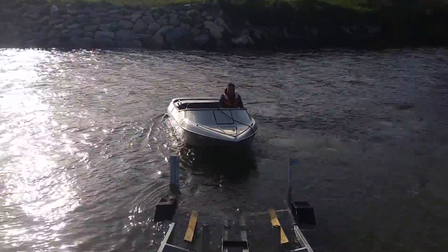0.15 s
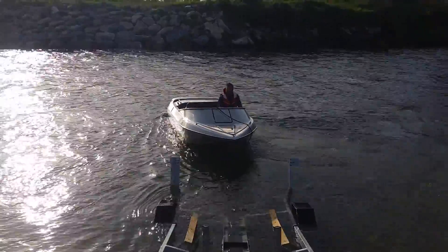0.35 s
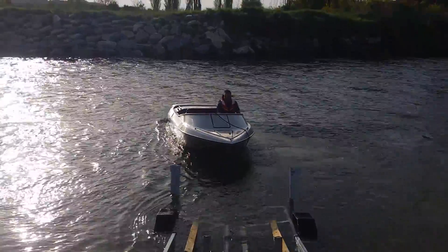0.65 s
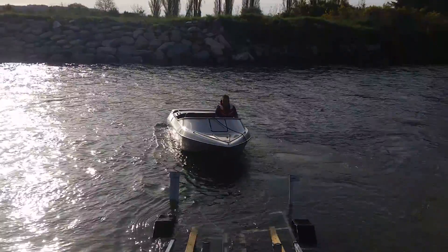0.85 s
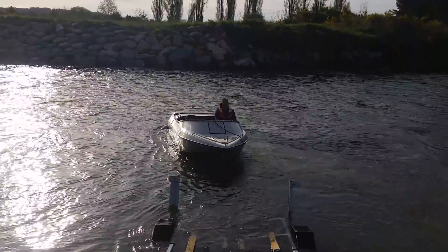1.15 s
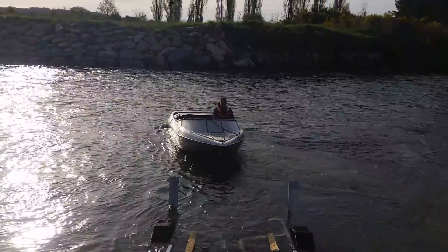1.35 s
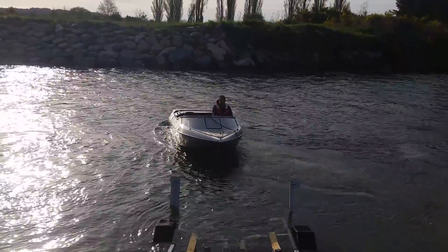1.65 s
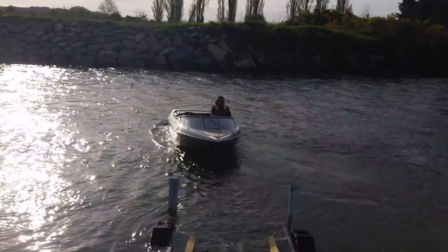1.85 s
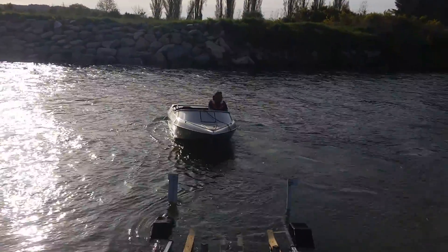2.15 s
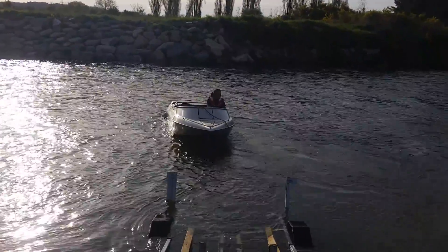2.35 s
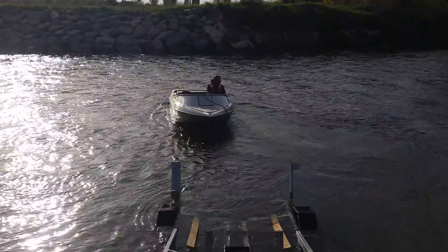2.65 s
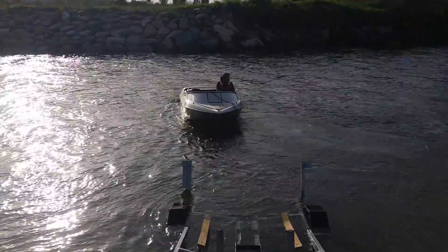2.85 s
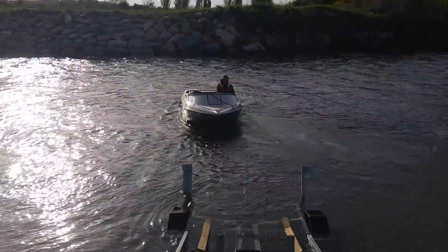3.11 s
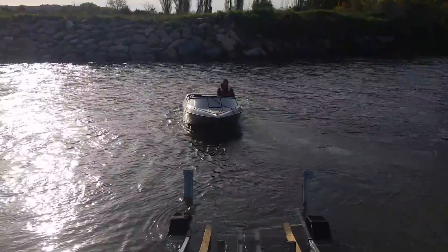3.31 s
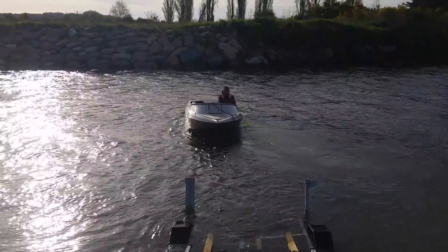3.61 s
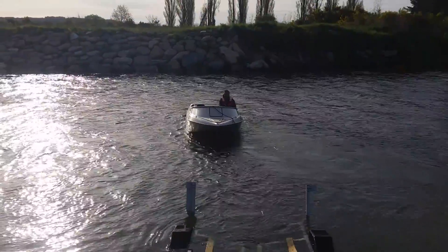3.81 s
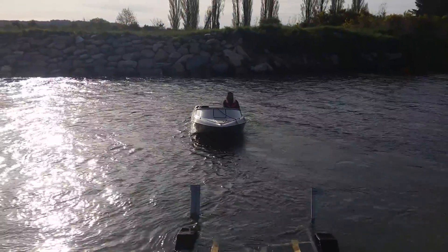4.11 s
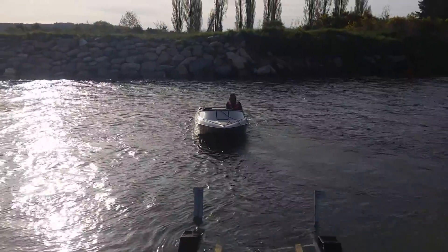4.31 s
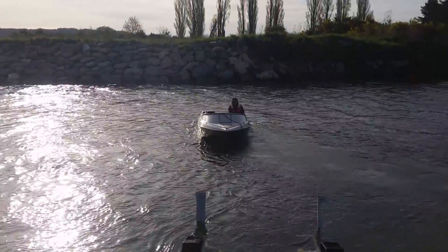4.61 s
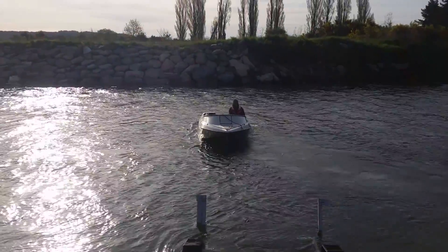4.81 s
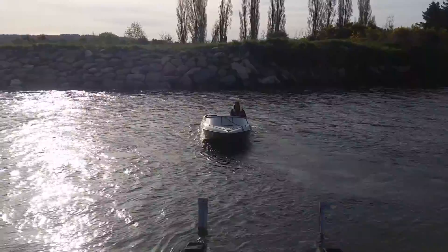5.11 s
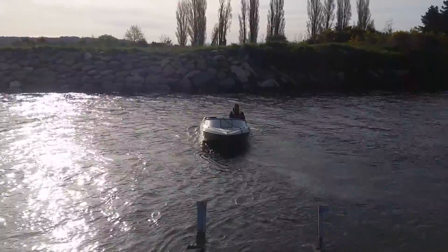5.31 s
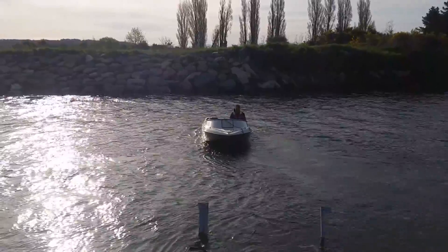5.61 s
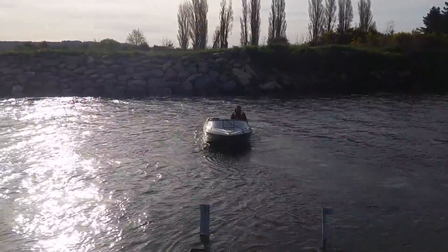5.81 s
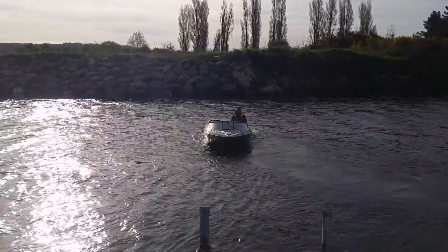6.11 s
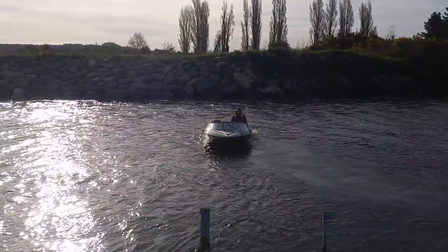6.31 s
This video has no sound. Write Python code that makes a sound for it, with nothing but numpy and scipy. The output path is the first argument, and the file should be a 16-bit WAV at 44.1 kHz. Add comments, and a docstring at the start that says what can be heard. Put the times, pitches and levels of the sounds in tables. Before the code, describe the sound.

The sound fades in within the first half second on a boat engine idling on a river: a low, steady hum with a loping throb, slightly to the left. Its exhaust burbles at the waterline in short, irregular swells. Water rumbles underneath, with a soft wash that slowly eases, a faint machinery sizzle and a thin high hiss. Close handling noises stand out on top. A thud comes at 0.2 seconds, then a knock and short finger scrapes around 0.5. A quick cluster of sharp knocks follows at 1 second, and three pops hit the left side around 1.7. Two lighter knocks and faint scrapes come between 2.7 and 2.9, and a single left pop at 4.1. A louder burst of pops strikes the left at about 5.4 to 5.5. The engine keeps idling at the same speed until the end, near 6.4 seconds.

```python
"""A jetboat's V6 idles on a river as the boat drifts off a ramp. Its firings hum, ring the exhaust
pipe into a throb and burble through a gas pocket at the waterline. Water rumbles and washes, the
machinery sizzles faintly, and a thin hiss lies on top. Fingers shift on the hand-held camera:
knocks and short scrapes ring its case, and sharp pops hit the left microphone port."""
import sys
import numpy as np
from scipy import signal
from scipy.fft import rfft, irfft, next_fast_len
from scipy.io import wavfile
from scipy.ndimage import uniform_filter1d, map_coordinates

SR = 44100
rng = np.random.default_rng(int(sys.argv[2]) if len(sys.argv) > 2 else 0)


def output_pcm(signal):
    """Save a mono or channel-first signal as 16-bit PCM at the path in sys.argv[1].

    Samples are clipped to [-1, 1] before scaling.
    """
    pcm = np.clip(np.atleast_2d(signal).T, -1, 1) * 32767
    wavfile.write(sys.argv[1], SR, np.round(pcm).astype(np.int16))


N = 284908

# Strongest engine lines, ahead of DRONE_GAINS_DB: time_s, harmonic2_db, harmonic3_db, harmonic4_db
DRONE_LEVELS = [(0.25, -35.5, -33.5, -27), (2.15, -39, -32.0, -27), (2.75, -32, -29, -36.5),
                (3.05, -39, -32, -29), (3.45, -39.5, -25.5, -32), (4.2, -37, -33.5, -30.5),
                (4.5, -35.5, -24, -31.5), (5.0, -42.5, -35.5, -34.5), (5.35, -39.5, -30.5, -33.5),
                (6.44, -30.5, -33, -50)]
# Hum and faint whine as the boat drifts: harmonic, start_db, slope_db_per_s
HUM_LINES = [(1, -43.5, -1.5), (5, -39, 0), (8, -61.5, 0.1), (10, -57.5, -0.63), (13, -69.5, 0.5),
             (14, -55, -2.5), (16, -54.5, -2)]
# Lines lifted by the gas pocket: harmonic, level_re_burble_db
POCKET_HARMONICS = [(5, -9.5), (6, -4.5)]
# Exhaust pipe resonances: centre_hz, width_hz, gain_db
PIPE_MODES = [(43.6, 33, -9), (81.7, 14, -5.5), (108.1, 13, -1)]
# Gas pocket under the stern: centre_hz, width_hz, gain_db
POCKET_MODES = [(183.4, 24, -13), (229.7, 11.25, 7)]
# Outlet dipping in and out of the water, ahead of BURBLE_GAIN_DB: time_s, level_db
BURBLE_LEVELS = [(0.25, -40), (0.79, -29.5), (1.09, -26), (1.19, -34), (1.93, -25.5), (2.17, -26.5),
                 (2.31, -36), (2.95, -25.5), (3.03, -32), (3.67, -32), (3.77, -25), (3.97, -35.5),
                 (4.61, -24.5), (4.73, -34), (4.87, -24.5), (4.97, -33.5), (5.09, -26), (5.23, -36.5),
                 (5.37, -29.0), (5.75, -37.5), (5.89, -30), (6.03, -37.0), (6.29, -26.5), (6.44, -27.5)]
# Noise spectra: freq_hz, gain_db
RUMBLE_SPECTRUM = [(10, -31.5), (22, -11.5), (42, -2.5), (65, 2.5), (130, 2), (245, -7.5), (290, -14),
                   (450, -36), (900, -75.5)]
WASH_SPECTRUM = [(150, -10), (300, 6), (450, -1), (640, 1), (1000, -6), (1300, -12), (1700, -13),
                 (2400, -26), (4200, -29.5), (5500, -40), (8000, -49.5)]
SIZZLE_SPECTRUM = [(2000, -44.5), (2800, -20.5), (3150, -1.5), (3350, 0.5), (3800, -13), (4400, -13.5),
                   (5200, -31.5), (8000, -50)]
HISS_SPECTRUM = [(3000, -12.5), (8000, -20), (10000, -16), (13000, 2.5), (15700, 3.5), (16000, -26.5)]
# Left-right likeness of the noise: freq_hz, correlation (clipped to 1)
NOISE_CORRELATION = [(30, 1.6), (70, .75), (280, 0.9), (500, 0.62), (700, 0), (1400, 0.23), (3100, 0)]
# Noise balance: freq_hz, left_minus_right_db
NOISE_BALANCE = [(30, -2), (100, -3.5), (550, 1), (700, 2), (1000, 11), (1300, 3.5), (1600, 5.5),
                 (2400, -4), (2900, 7), (3300, 11.5), (4200, 5), (5500, -6.5), (9000, 3), (15000, 0)]
# Swells and dips of the treble: time_s, gain_db
TREBLE_SWELLS = [(.2, 8), (.45, 5), (1.45, .5), (1.7, 7), (1.93, 1), (5.3, 0.5), (5.48, -6.5), (5.72, -1),
                 (6.1, -13.5), (6.42, -1)]
# Knocks on the case: time_s, thud_db, thud_rise_s, ring_db, crack_db
CASE_KNOCKS = [(0.2399, 12.5, 0.0027, -29, -52.5), (0.3285, -40, 0.0011, -38, -38),
               (0.4496, -3, 0.00032, -3.5, -28), (0.9877, -43, .0005, -27, -36),
               (1.0028, -28, 0.00054, -13, -61), (1.0149, -1.5, 0.00039, -14, -55),
               (1.037, 0, 0.00055, -25, -41), (1.0418, 5, 0.00051, -2, -23),
               (2.7095, -6, 0.00068, -15.5, -48), (2.733, -6.5, 0.00053, -19.5, -29.5),
               (2.769, -50, .0005, -43, -31)]
# Case resonances: centre_hz, width_hz, gain_db
CASE_MODES = [(592, 130, -1), (942, 187, 0.5), (1155, 185, 1.5), (1460, 310, -4), (1860, 740, -10.5)]
# Finger scrapes: start_s, length_s, start_db, fade_db, hiss_gain_db
FINGER_SCRAPES = [(0.447, 0.095, -21, 9.5, -37), (0.576, 0.025, -42, -13, -43),
                  (0.593, 0.051, -26.5, 28.5, -43), (1.011, 0.025, -26.5, -7, -48),
                  (1.034, 0.019, -30, 1, -20.5), (2.703, 0.055, -41, 13, -48),
                  (2.864, 0.062, -48.5, 1.5, -36)]
# Pops on the left port: start_s, level_db, decay_s
PORT_POPS = [(1.6448, -2.5, 0.0028), (1.686, -1.5, 0.0014), (1.7105, -9, 0.0022), (4.0849, -5.5, 0.0017),
             (5.402, 4, 0.0029), (5.4607, 5, 0.0013), (5.4716, -1.5, 0.00065), (5.4756, -2.5, 0.00065),
             (5.4764, 3.5, 0.0029)]
# Port response to contact sounds: freq_hz, gain_db
PORT_RESPONSE = [(100, 1), (1400, -0.5), (2400, -10), (3300, -2.5), (4300, -11), (5800, -21.5),
                 (8000, -14.5), (10000, -22.5), (13000, -5), (16000, -12)]

FIRING_HZ, WANDER_HZ = 39.26, 0.2
DRONE_GAINS_DB, LINE_SAG_DB = (-3, -4.5, -5.5), 1.73
THROB_DB, THROB_SWING_DB = -37, 5
BURBLE_GAIN_DB, BURBLE_SAG_DB = 0.73, 0.8
FINGER_LIFT_S = 0.016
BAND_LIMIT_HZ = 16500
TIME_S = np.arange(N) / SR


def amp(db):
    """Decibels to gain."""
    return 10 ** (np.asarray(db) / 20)


def unit(x):
    """Scale to rms 1."""
    return x / np.sqrt(np.mean(x ** 2) + 1e-20)


def even(x, span_s):
    """Scale to a running rms near 1."""
    return x / np.sqrt(np.abs(uniform_filter1d(x * x, int(span_s * SR))) + 1e-3 * np.mean(x * x))


def along(points, hz):
    """Read (freq_hz, value) points on a log axis."""
    freqs_hz, values = np.transpose(points)
    return np.interp(np.log(hz + 1), np.log(freqs_hz + 1), values)


def curves(rows):
    """One per-sample curve for each column after the time."""
    times_s, *columns = np.transpose(rows)
    return [np.interp(TIME_S, times_s, column) for column in columns]


def wobble(rate_hz):
    """Smooth random curve, rate_hz knots a second."""
    return map_coordinates(rng.standard_normal(2048), [TIME_S * rate_hz], mode="wrap")


def filtered(x, response):
    """Apply a complex frequency response."""
    size = next_fast_len(N + SR // 2)
    return irfft(rfft(x, size) * response(np.fft.rfftfreq(size, 1 / SR)), size)[..., :N]


def resonate(x, modes):
    """Parallel band-pass resonances."""
    return filtered(x, lambda hz: sum(amp(db) * 1j * hz * width / (centre**2 - hz**2 + 1j * hz * width)
                                      for centre, width, db in modes))


def muffle(x, edge_hz, order):
    """Causal low-pass."""
    return signal.sosfilt(signal.butter(order, edge_hz, fs=SR, output="sos"), x)


def colour(x, points, size=2048):
    """Minimum-phase filter through (freq_hz, gain_db) points."""
    cepstrum = irfft(np.log(amp(along(points, np.fft.rfftfreq(size, 1 / SR)))))
    cepstrum[1:size // 2] *= 2
    cepstrum[size // 2 + 1:] = 0
    impulse = irfft(np.exp(rfft(cepstrum)))
    return signal.fftconvolve(x, impulse[None], axes=1)[:, :N]


def place(x, left_db, left_lag_s):
    """Mono to stereo by level and time difference."""
    return np.array([amp(side * left_db / 2)
                     * filtered(x, lambda hz: np.exp(-1j * np.pi * hz * side * left_lag_s))
                     for side in (1, -1)])


def rush(spectrum, patchy_db):
    """Stereo noise, rms 1, with random gain patches in time and frequency."""
    cells = signal.stft(rng.standard_normal((2, N)), nperseg=512)[2]
    patches = uniform_filter1d(rng.standard_normal(cells.shape[1:]), size=4, axis=0)
    patches = unit(uniform_filter1d(patches, size=10, axis=1))
    pair = signal.istft(cells * amp(patchy_db * patches), nperseg=512)[1][:, :N]

    def mid_side_gains(hz):
        angle = np.arccos(np.clip(along(NOISE_CORRELATION, hz), -1, 1)) / 2
        return amp(along(spectrum, hz)) * [np.cos(angle), np.sin(angle)]

    mid, side = filtered(pair, mid_side_gains)
    stereo = np.array([mid + side, mid - side])
    return unit(filtered(stereo, lambda hz: amp(np.outer([.5, -.5], along(NOISE_BALANCE, hz)))))


def drift_db(base_db, db_per_s, treble_share):
    """Level ramp plus a share of the treble swells."""
    return base_db + db_per_s * TIME_S + treble_share * curves(TREBLE_SWELLS)[0]


def ticks(times_s, levels_db):
    """Single-sample impulses."""
    return np.bincount(np.round(times_s * SR).astype(int), amp(levels_db), N)


def push(start_s, decay_s, swing_hz, rise_s):
    """Pressure step that leaks away and swings back."""
    t = np.arange(SR // 20) / SR
    shape = (1 - np.exp(-(t / rise_s) ** 2)) * np.exp(-t / decay_s) * np.cos(2 * np.pi * swing_hz * t)
    return np.pad(shape, (round(start_s * SR), N))[:N]


def hum_line(firing_cycles, harmonic, level_db):
    """One harmonic of the firing rate, wavering with the uneven idle."""
    gain = amp(level_db - LINE_SAG_DB * wobble(7) ** 2)
    phase_rad = 2 * np.pi * (harmonic * firing_cycles + rng.random()) + 0.32 * wobble(9)
    return gain * np.sqrt(2) * np.sin(phase_rad)


def engine_hum(firing_cycles, burble_db):
    """Firing harmonics: drone, hum and the lines the gas pocket lifts."""
    drone = zip((2, 3, 4), curves(DRONE_LEVELS), DRONE_GAINS_DB)
    lines = [(harmonic, db + gain_db) for harmonic, db, gain_db in drone]
    lines += [(harmonic, db + db_per_s * TIME_S) for harmonic, db, db_per_s in HUM_LINES]
    lines += [(harmonic, burble_db + db) for harmonic, db in POCKET_HARMONICS]
    return sum(hum_line(firing_cycles, harmonic, db) for harmonic, db in lines)


def pipe_throb(firing_cycles):
    """Firings above or below average strength make the pipe lope."""
    excess = np.diff(np.floor(firing_cycles), prepend=0) * rng.standard_normal(N)
    lope = muffle(resonate(excess, PIPE_MODES), edge_hz=140.4, order=6)
    return amp(THROB_DB + THROB_SWING_DB * wobble(6.5)) * even(lope, span_s=0.21)


def pocket_burble(firing_cycles, level_db, scatter_db=0.5, jitter_s=0.00093):
    """Exhaust breaks through the water in uneven pulses that ring the gas pocket."""
    onsets = np.flatnonzero(np.diff(np.floor(firing_cycles)))
    weakness, lateness = rng.standard_normal((len(onsets), 2)).T
    onsets = np.clip(onsets + np.round(lateness * jitter_s * SR).astype(int), 0, N - 1)
    pulses = np.bincount(onsets, amp(-scatter_db * weakness), N)
    burble = muffle(resonate(pulses, POCKET_MODES), edge_hz=262.6, order=16)
    return amp(level_db) * even(burble, span_s=0.12)


def engine():
    """One wandering firing rate drives hum, throb and burble."""
    firing_cycles = np.cumsum(FIRING_HZ + WANDER_HZ * wobble(4)) / SR
    burble_db = curves(BURBLE_LEVELS)[0] + BURBLE_GAIN_DB - BURBLE_SAG_DB * wobble(14) ** 2
    hum = engine_hum(firing_cycles, burble_db)
    exhaust = pipe_throb(firing_cycles) + pocket_burble(firing_cycles, burble_db)
    return place(hum + exhaust, left_db=-2.3, left_lag_s=0.00018)


def water():
    """Churned water rumbles; its wash fades as the boat leaves."""
    rumble = amp(-36.5 + 2.3 * wobble(18)) * rush(RUMBLE_SPECTRUM, patchy_db=3.5)
    wash_db = drift_db(-49, db_per_s=-0.6, treble_share=0.33) + 0.24 * wobble(25)
    return rumble + amp(wash_db) * rush(WASH_SPECTRUM, patchy_db=1.5)


def machinery_sizzle():
    """Faint, narrow noise band near 3.3 kHz."""
    level_db = drift_db(-66, db_per_s=0.5, treble_share=0.16) + 0.5 * wobble(3) + 0.42 * wobble(40)
    return amp(level_db) * rush(SIZZLE_SPECTRUM, patchy_db=1.3)


def thin_hiss():
    """High hiss that swells and dips."""
    return amp(drift_db(-73, db_per_s=0, treble_share=1)) * rush(HISS_SPECTRUM, patchy_db=1.5)


def case_contact(force, direct):
    """A contact rings the case and partly reaches the ports directly; louder on the left."""
    ring = muffle(resonate(force, CASE_MODES), edge_hz=1510, order=2)
    return ring * amp([[0], [-11]]) + direct * amp([[0], [-2.5]])


def knocks(crack_t60_s=0.0035):
    """Fingers knock the case: low thud, ring and dry crack."""
    times_s, thud_db, rises_s, ring_db, crack_db = np.transpose(CASE_KNOCKS)
    pushes = sum(amp(db) * push(time_s - rise_s, decay_s=0.0013, swing_hz=138, rise_s=rise_s)
                 for time_s, db, rise_s in zip(times_s, thud_db, rises_s))
    thuds = place(muffle(pushes, edge_hz=1360, order=4), left_db=2.5, left_lag_s=-0.00055)
    burst = rng.standard_normal((2, 300)) * amp(-60 * TIME_S[:300] / crack_t60_s)
    cracks = signal.fftconvolve(ticks(times_s, crack_db - 0.5)[None], burst, axes=1)[:, :N]
    return thuds + case_contact(force=ticks(times_s, ring_db + 22), direct=cracks)


def scrapes():
    """Skin slips over the plastic in dense tiny catches, different at each port."""
    grit = unit(rng.standard_normal((2, N)) * amp(2.5 * wobble(300)) * (rng.random((2, N)) < 0.3))
    rub, hiss = np.zeros((2, N))
    for start_s, length_s, start_db, fade_db, hiss_gain_db in FINGER_SCRAPES:
        progress = np.clip((TIME_S - start_s) / length_s, 0, 1)
        contact = (TIME_S > start_s) * np.clip((start_s + length_s - TIME_S) / FINGER_LIFT_S, 0, 1)
        stroke = amp(start_db - fade_db * progress) * contact
        rub += amp(14) * stroke
        hiss += amp(hiss_gain_db + 20) * stroke
    return case_contact(force=rub * grit, direct=hiss * grit)


def pops():
    """A fingertip catches on the left port only: pressure steps, each edged with a thin snap."""
    steps = sum(amp(db - 3.5) * push(start_s, decay_s, swing_hz=142, rise_s=0.00009)
                for start_s, db, decay_s in PORT_POPS)
    starts_s, levels_db, _ = np.transpose(PORT_POPS)
    impulses = ticks(starts_s + 0.0002, levels_db - 10.5)
    snaps = impulses - muffle(impulses, edge_hz=13800, order=1)
    return np.array([steps + snaps, np.zeros(N)])


def scene():
    """Boat and river, plus contact sounds coloured by the microphone port."""
    outdoors = engine() + water() + machinery_sizzle() + thin_hiss()
    return outdoors + colour(knocks() + scrapes() + pops(), PORT_RESPONSE)


def record(dry):
    """The camera fades in, rounds off the highest peaks and limits the band."""
    fade_in_db, = curves([(0, -77), (.115, -97), (.133, -17.5), (.21, -9.5), (.27, -4), (.4, -1.5)])
    faded = dry * amp(fade_in_db)
    rounded = faded / (1 + np.abs(faded / 0.9) ** 6) ** (1 / 6)
    return filtered(rounded, lambda hz: 1 / np.sqrt(1 + (hz / BAND_LIMIT_HZ) ** 160))


dry = scene()
out = record(dry)
output_pcm(out)
```